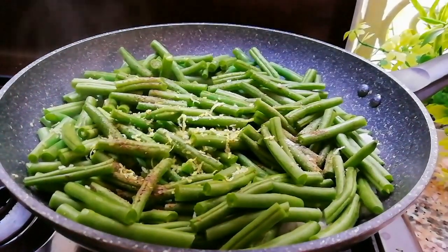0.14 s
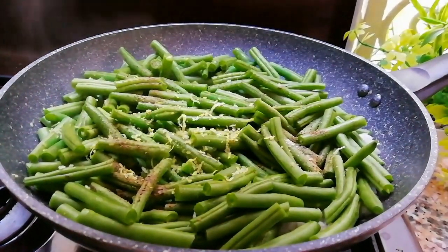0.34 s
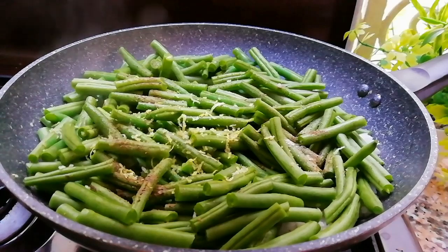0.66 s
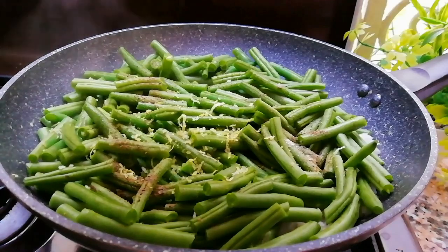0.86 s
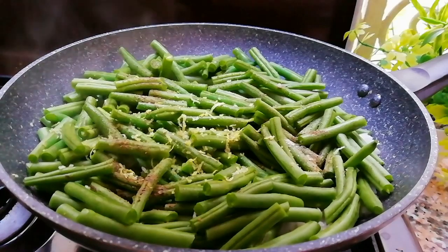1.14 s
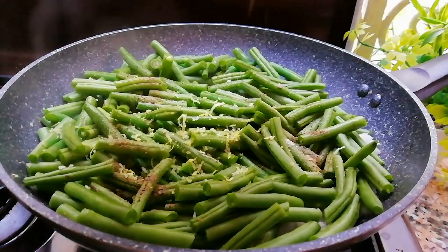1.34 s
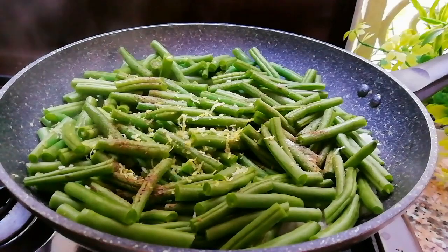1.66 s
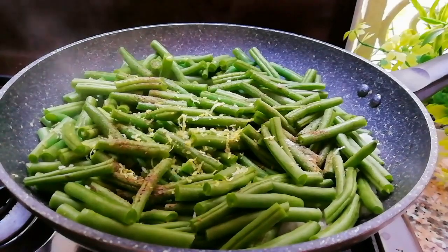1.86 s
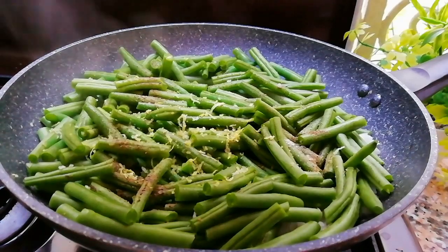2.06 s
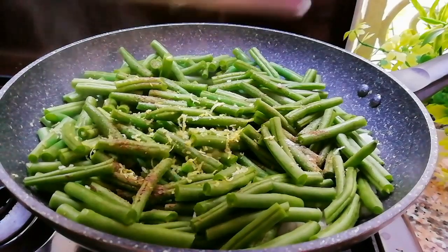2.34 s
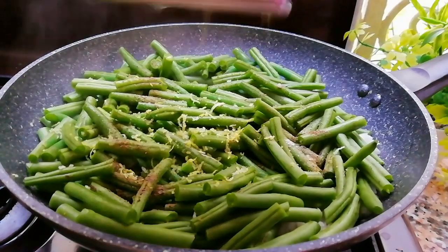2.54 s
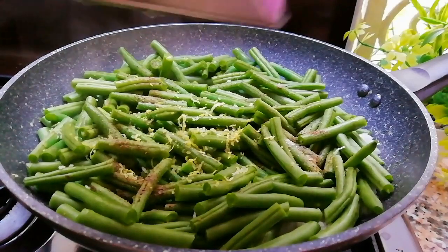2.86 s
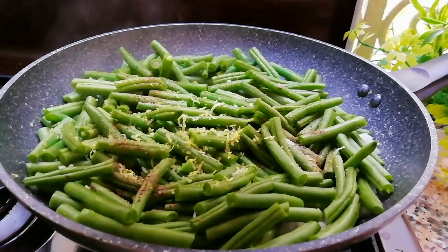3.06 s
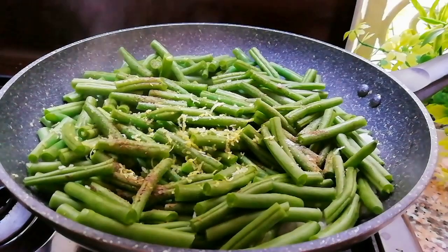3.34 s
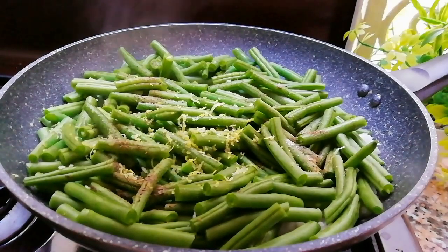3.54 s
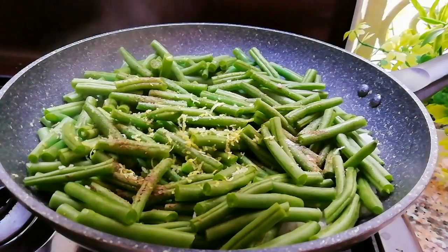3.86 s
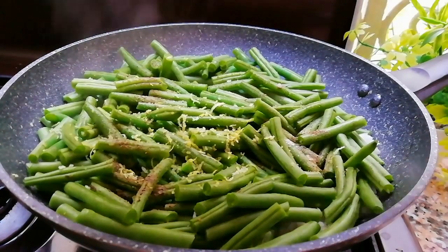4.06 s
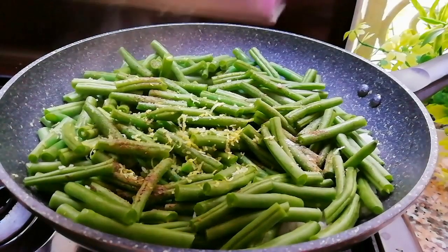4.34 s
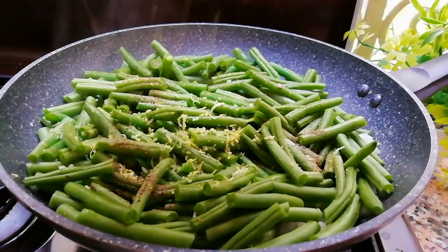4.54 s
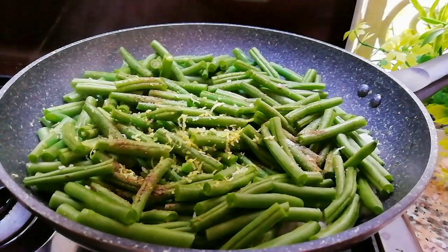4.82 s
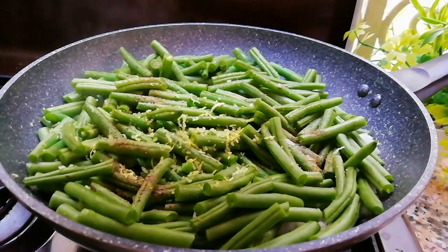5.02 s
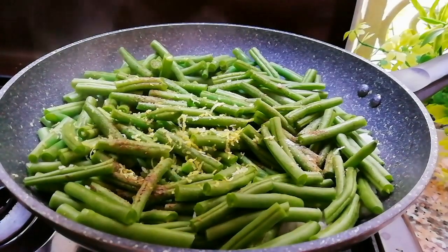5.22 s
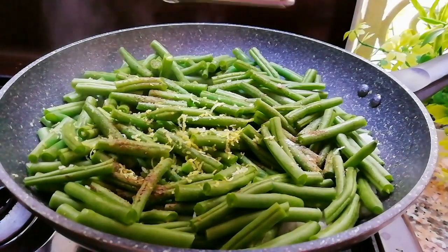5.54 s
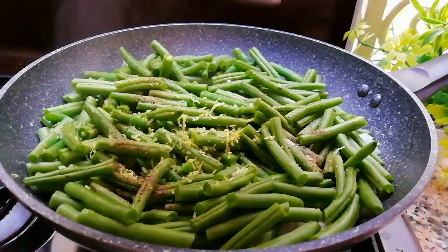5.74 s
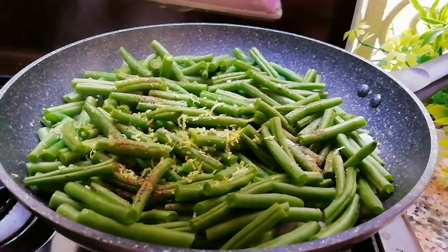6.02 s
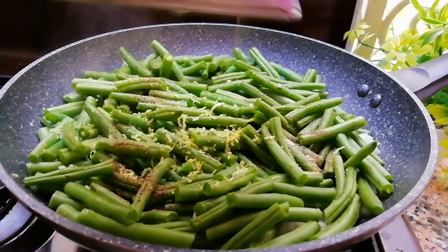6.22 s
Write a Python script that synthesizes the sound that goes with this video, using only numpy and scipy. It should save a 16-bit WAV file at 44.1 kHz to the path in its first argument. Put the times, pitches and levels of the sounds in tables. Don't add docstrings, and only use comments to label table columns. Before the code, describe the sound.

A lemon is scraped in short raspy strokes over a ringing metal grater, above a pan sizzling steadily in hot oil.

```python
import sys
import numpy as np
from scipy import signal
from scipy.fft import rfft, irfft
from scipy.io import wavfile
from scipy.ndimage import uniform_filter1d

SR = 44100
rng = np.random.default_rng(int(sys.argv[2]) if len(sys.argv) > 2 else 0)


def output_pcm(signal):
    pcm = np.clip(np.atleast_2d(signal).T, -1, 1) * 32767
    wavfile.write(sys.argv[1], SR, np.round(pcm).astype(np.int16))


def decibels_to_gain(level_db):
    exponent = np.asarray(level_db, float) / 20
    return 10 ** exponent


N = 281779

# pitch_hz, level_db
FLAME_COLOUR = [(40, -9.5), (130, -4), (400, -1.5), (580, -3), (680, -7.5), (1000, -6), (1500, -30)]
# pitch_hz, width_hz, level_db, left_extra_db
PAN_RING_TONES = [(520.5, 14.7, 0, 8), (1155, 35, -10, 1.5)]
# middle_s, half_length_s, level_db
GUSTS = [
    (.16, 0.032, -60),
    (1.39, 0.047, -61),
    (1.68, 0.029, -52.5),
    (2.15, 0.1, -66),
    (3.33, 0.019, -59),
    (4.95, .06, -60),
]
# middle_s, half_length_s, level_db
RING_PUFFS = [
    (0, 0.11, -62.5),
    (.865, 0.02, -53),
    (1.31, 0.014, -61),
    (1.7, 0.015, -48.5),
    (2.2, 0.15, -62),
    (2.99, .1, -64),
    (3.33, 0.034, -66),
    (5.6, 0.062, -57),
    (6.07, 0.035, -61),
]
# time_s, sizzle_level_db
HEAT = [
    (0, -38),
    (.45, -39),
    (.9, -38),
    (1.7, -39),
    (2.97, -37.5),
    (3.63, -39),
    (4.55, -37.5),
    (5.9, -39),
    (6.2, -35.5),
    (6.39, -40),
]
# pitch_hz, level_db
SIZZLE_COLOUR = [(200, -1), (680, 3), (1000, 7), (1900, 7.5), (2600, 4), (4000, 1.1), (9000, -1.47),
                 (10600, -2.5), (11500, -10.5)]
# start_s, peak_db
OIL_SPITS = [(0.8848, -32), (1.2759, -35), (2.8603, -36), (3.1995, -23), (3.2074, -21), (3.2184, -30),
             (2.235, -34), (2.256, -30), (4.2027, -27), (4.49, -32), (4.713, -17), (1.635, -24),
             (4.8732, -30), (4.8827, -29), (5.2758, -21), (5.7562, -28)]
# bite_s, build_up_s, hold_s, easing_off_s, tearing_db
STROKES = [(0.609, 0.049, 0.03, 0.0072, -27), (0.993, .03, 0.036, 0.052, -26.5),
           (1.91, 0.049, 0.01, 0.052, -23.5), (2.287, 0.014, .035, 0.015, -24),
           (2.615, 0.051, 0.0094, 0.02, -21), (2.936, 0.038, 0.045, 0.032, -24),
           (3.86, 0.033, 0.043, 0.045, -29.5), (4.269, 0.016, 0.047, 0.035, -24),
           (4.607, 0.043, 0.013, 0.04, -24), (5.576, 0.025, 0.018, 0.037, -25.5),
           (5.869, 0.024, 0.073, 0.017, -29), (6.134, 0.041, 0.027, 0.046, -25)]
# jump_at_bite_db, then blade_twist_db, frame_bend_db, handle_flex_db re tearing
GRIPS = [(0, -17.5, -18.5, -17.5), (-1, -14, -20, -16), (7, -16.5, -18, -16.5), (3, -17, -20, -18),
         (0, -18, -21.5, -25), (5, -15, -14, -23), (11, -16, -21, -16.5), (6, -15.5, -17.5, -18),
         (10, -17, -15.5, -17), (-1.5, -18.5, -19.5, -14), (1, -15, -15.5, -16.5), (14, -13, -15.5, -15)]
# bite_s, hold_s, easing_off_s, tearing_db
REBITES = [
    (0.693, 0.048, 0.038, -35),
    (2.35, 0.0036, 0.04, -23.5),
    (2.696, 0.0062, 0.03, -26),
]
# blade_twist_db, frame_bend_db, handle_flex_db
REBITE_GRIP = (-15, -20.5, -25)
# middle_s, half_length_s, tearing_db, handle_flex_db
TOUCHES = [
    (0.134, 0.0075, -57, -45.5),
    (0.503, .015, -53, -51.5),
    (0.912, 0.0098, -55, -52),
    (1.656, .02, -54, -64),
    (3.749, 0.011, -71, -46),
    (6.071, 0.015, -40, -40),
]
# blade_twist_db, frame_bend_db
TOUCH_GRIP = (-5, -5.5)
# middle_s, level_db
SNAGS = [(0.6555, -16), (0.681, -13), (.7199, -22), (0.7388, -20), (.7573, -23), (1.0147, -16),
         (1.044, -17), (1.0601, -14), (1.093, -22), (1.1145, -24), (1.9062, -22), (1.9685, -15),
         (2.2903, -13), (2.318, -15), (2.3551, -10), (2.369, -17), (2.3891, -20), (2.617, -17),
         (2.6769, -12), (2.7019, -17), (3.895, -19), (3.9286, -17), (4.5861, -21), (4.627, -15),
         (4.6469, -15), (4.6584, -10), (5.5818, -18), (5.6192, -12), (5.8667, -19), (6.2383, -15)]
# pitch_hz, level_db
RIP_COLOUR = [(500, -20), (2500, 3), (5000, 7), (7500, 2), (10000, -7)]
# pitch_hz, level_db
TEARING_COLOUR = [(30, 1), (300, 7.5), (700, 6), (2000, 6.5), (3500, 2), (6000, -1.5), (9000, -0.5),
                  (10600, -0.5), (11500, -9)]
# pitch_hz, width_hz, level_db, left_extra_db
BLADE_TONES = [(1299, 54, 7.5, -12), (1364, 76, -1.5, 1), (1566, 62, 0, 4), (1920, 77, -15, 7.5),
               (2350, 47, -13, 10)]
FRAME_TONES = [(544, 94, -0.5, 0), (774, 42, 6.5, -2), (793, 64, 1, 4), (857, 44, 2.5, 3.5),
               (1035, 44, -5, 13), (1110, 26, 0, 9), (1270, 66, -12, -1)]
HANDLE_TONES = [(396.5, 35.6, 4.5, -6), (424.6, 47, 2.9, -1.5)]
# pitch_hz, gain_db
LEFT_PORT = [(30, 4), (1000, 1), (2200, 1.5), (3600, 9.5), (5000, 13.5), (6200, 15), (7000, 19.5),
             (7650, 26.5), (8200, 20.5), (9000, 15.5), (10500, 10.5), (11300, 11), (11750, 41.5)]
RIGHT_PORT = [(1500, -0.5), (4000, 0), (11000, -1)]
TOP_CUT = [(10000, 0.81), (11000, 2), (11400, -5.5), (11600, -21), (11750, -43), (12100, -72)]

BUILD_DB_PER_S, APPROACH_DB_PER_S = 180, 483
LIFT_AFTER_DB, LIFT_DB_PER_S = 12, 1000
RING_FOLLOWS, RING_LAG_S = 0.86, 0.005


def rms_one(x):
    return x / np.sqrt(np.mean(x ** 2) + 1e-20)


def colour(x, points):
    hz, db = np.transpose(points)
    grid = np.maximum(np.arange(1025) * SR / 2048, 1)
    gain_db = np.interp(np.log(grid), np.log(hz), db)
    cepstrum = irfft(np.log(decibels_to_gain(gain_db)))
    cepstrum[1:1024] *= 2
    cepstrum[1025:] = 0
    response = irfft(np.exp(rfft(cepstrum)))
    return signal.oaconvolve(x, response)[:N]


def peak(x, hz, width):
    r = np.exp(-np.pi * width / SR)
    ring = [1, -2 * r * np.cos(2 * np.pi * hz / SR), r * r]
    return signal.lfilter([1, 0, -1], ring, x + 1e-18) * (1 - r * r) / 2


def drift(rate):
    r = np.exp(-2 * np.pi * rate / SR)
    noise = rng.standard_normal(N + SR)
    return rms_one(signal.lfilter([1], [1, -2 * r, r * r], noise)[SR:])


def resonate(x, modes, wander_db, wander_rate):
    out = np.zeros((2, N))
    for k, (hz, width, db, left_db) in enumerate(modes):
        drive = x * decibels_to_gain(db + wander_db * drift(wander_rate))
        sides = decibels_to_gain(np.array([[left_db], [0]]))
        out += (-1) ** k * peak(drive, hz, width) * sides
    return out


def grains(per_s, spread_db):
    size_db = spread_db * np.minimum(rng.exponential(1, N), 5)
    sizes = decibels_to_gain(size_db) * rng.choice([-1, 1], N)
    return rms_one(sizes * (rng.random(N) < per_s / SR))


def bursts(events, length_s):
    out, t = np.zeros(N), np.arange(SR // 20) / SR
    for start_s, db in events:
        out[round(start_s * SR):][:len(t)] += decibels_to_gain(db) * np.exp(-t / length_s)
    return out


def swells(events):
    t = np.arange(N) / SR
    return sum(decibels_to_gain(db) * np.exp(-((t - s) / half_s) ** 2 / 2) for s, half_s, db in events)


def three_noises(shape):
    return [rms_one(shape(rng.standard_normal(N))) for _ in range(3)]


def moving_air(tear):
    stir_s = 0.086
    stir = decibels_to_gain(-24.5) * uniform_filter1d(tear, size=int(2 * stir_s * SR))
    air = decibels_to_gain(-72) + swells(GUSTS) + stir
    common, left, right = three_noises(lambda x: peak(x, 37, 62.0))
    return air * decibels_to_gain(-3.0) * (0.73 * common + np.array([left, right]))


def burner(burner_db):
    common, left, right = three_noises(lambda x: colour(x, FLAME_COLOUR))
    flicker = decibels_to_gain(burner_db - 2 + 1.0 * drift(13.0))
    roar = flicker * (common + 0.33 * np.array([left, right]))
    breath = decibels_to_gain(-67) + swells(RING_PUFFS)
    tones = resonate(rng.standard_normal(N), PAN_RING_TONES, wander_db=2.5, wander_rate=14.0)
    return roar + breath * decibels_to_gain(25) * tones


def pan(sizzle_db):
    swell = decibels_to_gain(sizzle_db - 11 + 0.14 * drift(1.4))
    spits = bursts(OIL_SPITS, length_s=0.0017) * decibels_to_gain(-22)
    near = swell * decibels_to_gain(1.0 * drift(140)) + spits
    far = swell * decibels_to_gain(-2.0 + 0.5 * drift(60))
    return np.array([rms_one(colour(grains(14000, 2.76), SIZZLE_COLOUR)) * level for level in (near, far)])


def push_db(t, bite, build, hold, ease, db, jump_db):
    start_db = db - BUILD_DB_PER_S * build
    since_bite = t - bite
    easing = since_bite - build - hold
    before = start_db - jump_db + APPROACH_DB_PER_S * since_bite
    eased_db = LIFT_AFTER_DB * np.clip(easing / ease, 0, 1)
    lifted_db = LIFT_DB_PER_S * np.maximum(easing - ease, 0)
    after = np.minimum(start_db + BUILD_DB_PER_S * since_bite, db) - eased_db - lifted_db
    return np.maximum(np.where(t < bite, before, after), -200)


def hand():
    t, levels = np.arange(N) / SR, np.zeros((4, N))
    pushes = [(stroke, jump, grip) for stroke, (jump, *grip) in zip(STROKES, GRIPS)]
    pushes += [((s, 0, hold, ease, db), 40, REBITE_GRIP) for s, hold, ease, db in REBITES]
    for stroke, jump, grip in pushes:
        tear_db = stroke[-1]
        levels[0] += decibels_to_gain(push_db(t, *stroke, jump))
        late_db = push_db(t - RING_LAG_S, *stroke, jump)
        ring_db = tear_db + RING_FOLLOWS * (late_db - tear_db)
        levels[1:] += decibels_to_gain(ring_db) * decibels_to_gain(np.array(grip))[:, None]
    touch_gains = decibels_to_gain(np.array([0, *TOUCH_GRIP]))[:, None]
    levels[:3] += swells([row[:3] for row in TOUCHES]) * touch_gains
    levels[3] += swells([(s, half_s, flex_db) for s, half_s, _, flex_db in TOUCHES])
    return levels


def teeth(level):
    tear = grains(20000, 1.5) * level
    plucks = grains(5000, 2.3) * level
    plucked_tooth = rng.integers(0, 28, N)
    pitches = np.geomspace(2300, 8800, 28) * decibels_to_gain(0.2 * rng.standard_normal(28))
    twang = np.zeros(N)
    for k, hz in enumerate(pitches):
        twang += peak(plucks * (plucked_tooth == k), hz, 99.0) * np.sqrt(hz / 3000)
    return colour(tear + decibels_to_gain(14.0) * twang, TEARING_COLOUR)


def snags():
    envelope = swells([(s, 0.0018, db) for s, db in SNAGS])
    left_right = decibels_to_gain(np.array([[-19], [-28]]))
    return colour(grains(20000, 1.3) * envelope, RIP_COLOUR) * left_right


def grater(levels):
    tear, twist, bend, flex = levels
    judder = decibels_to_gain(1.9 * drift(90))
    near = tear * judder * decibels_to_gain(-10.5)
    far = signal.lfilter([0.004], [1, -0.996], near) * decibels_to_gain(-3.5)
    bites = grains(5000, 3.2) * judder
    blade = resonate(bites * twist, BLADE_TONES, wander_db=3.5, wander_rate=11.8) * decibels_to_gain(18.5)
    frame = resonate(bites * bend, FRAME_TONES, wander_db=2.0, wander_rate=17.0) * decibels_to_gain(15.5)
    handle = resonate(bites * flex, HANDLE_TONES, wander_db=0.5, wander_rate=9.6) * decibels_to_gain(21.5)
    return np.array([teeth(near), teeth(far)]) + snags() + blade + frame + handle


def scene():
    levels = hand()
    heat_db = np.interp(np.arange(N) / SR, *np.transpose(HEAT))
    burner_db = -54.5 + 1.7 * (heat_db - heat_db.mean())
    return moving_air(levels[0]) + burner(burner_db) + pan(heat_db) + grater(levels)


def band_limit(x):
    return signal.sosfilt(signal.butter(12, 12180, fs=SR, output="sos"), x)


def record(dry):
    left = np.roll(colour(dry[0], LEFT_PORT), 6)
    right = colour(dry[1], RIGHT_PORT)
    mix = np.array([colour(port, TOP_CUT) for port in (left, right)])
    return band_limit(mix)


dry = scene()
out = record(dry)
output_pcm(out)
```